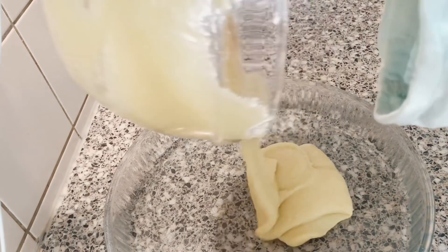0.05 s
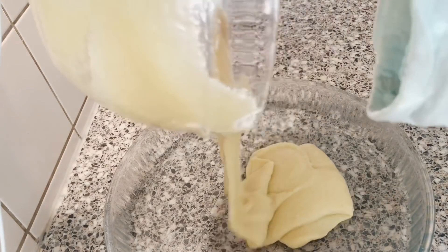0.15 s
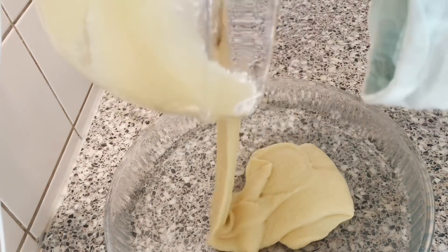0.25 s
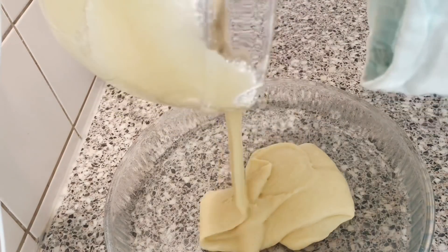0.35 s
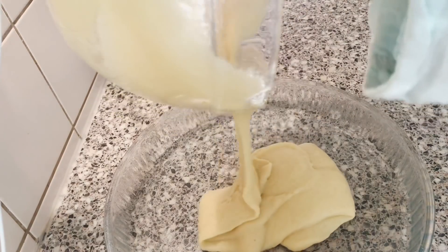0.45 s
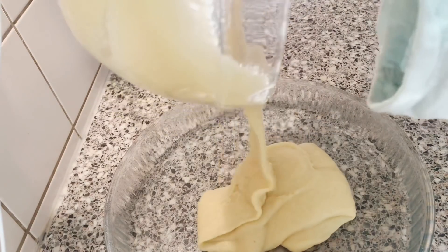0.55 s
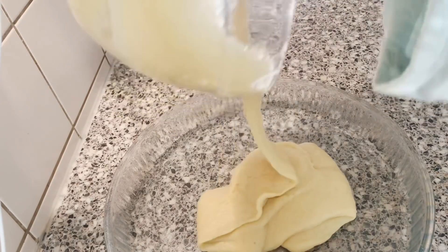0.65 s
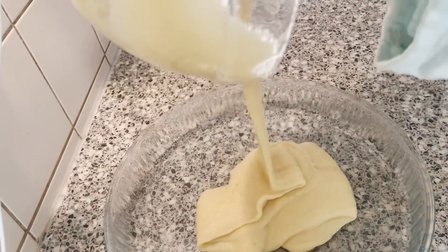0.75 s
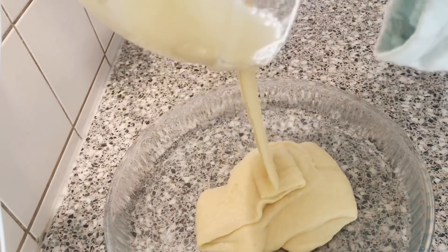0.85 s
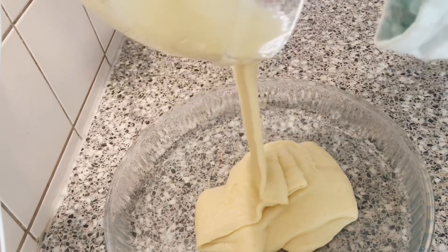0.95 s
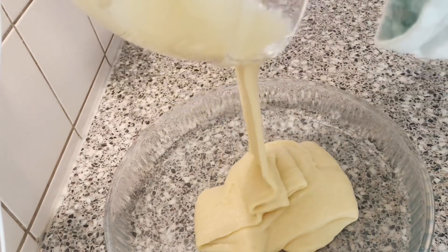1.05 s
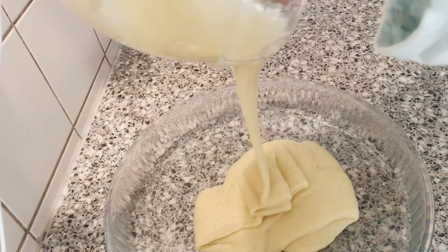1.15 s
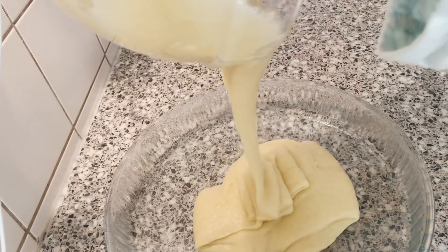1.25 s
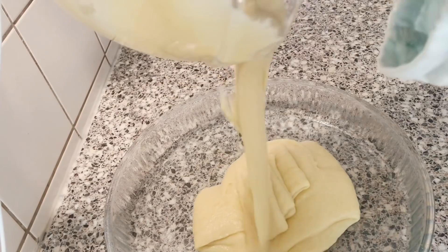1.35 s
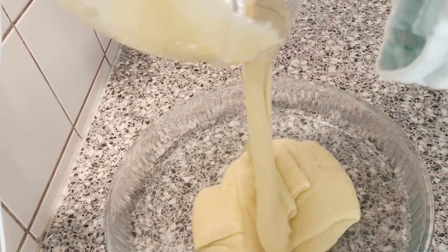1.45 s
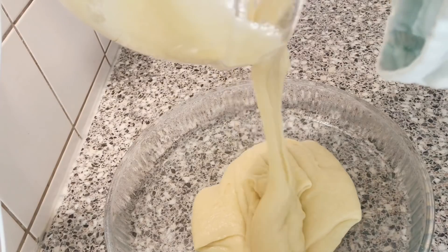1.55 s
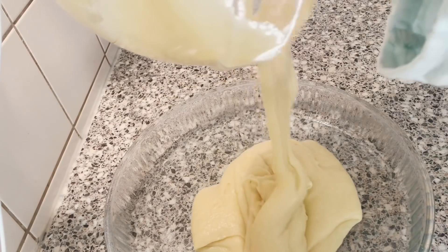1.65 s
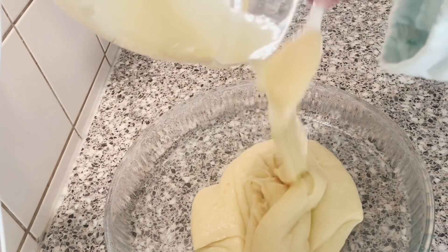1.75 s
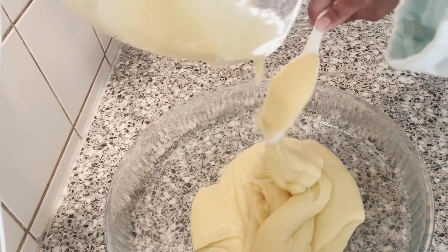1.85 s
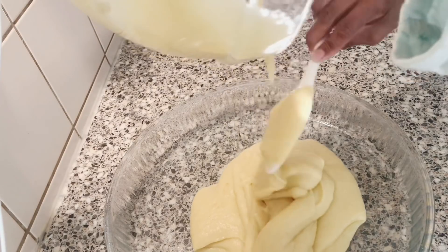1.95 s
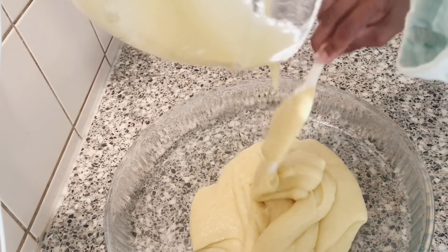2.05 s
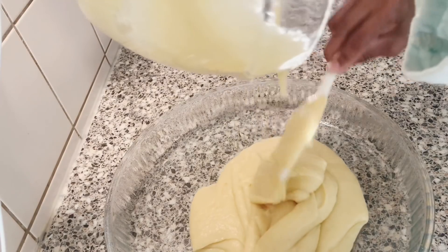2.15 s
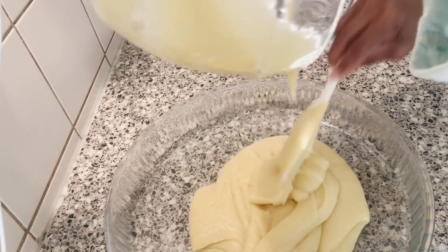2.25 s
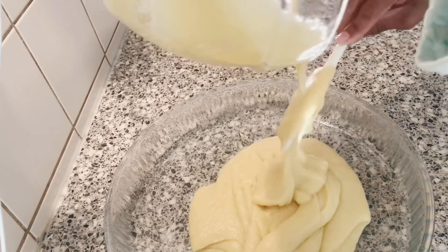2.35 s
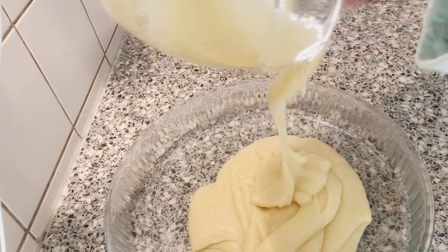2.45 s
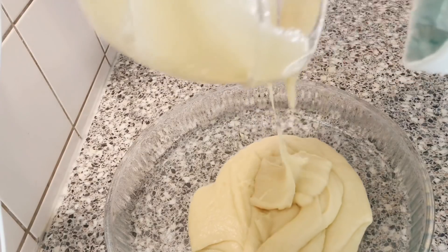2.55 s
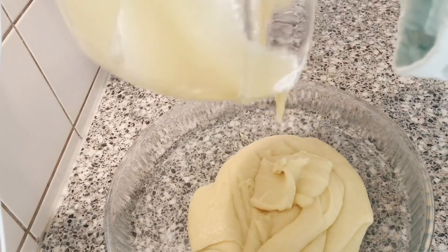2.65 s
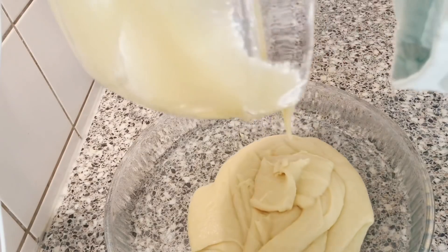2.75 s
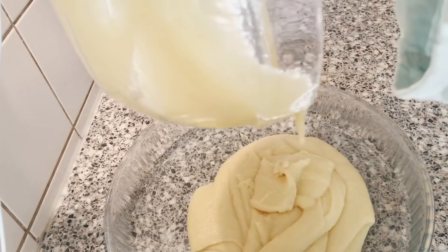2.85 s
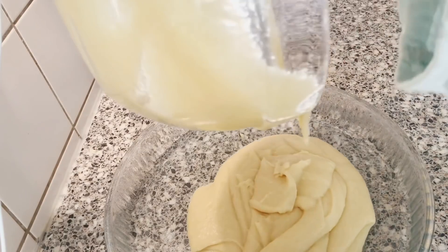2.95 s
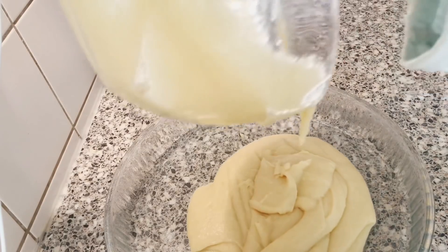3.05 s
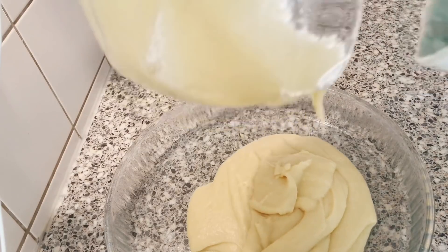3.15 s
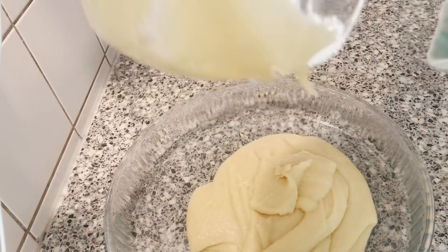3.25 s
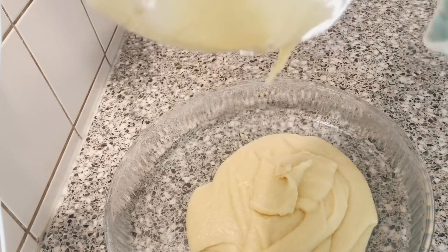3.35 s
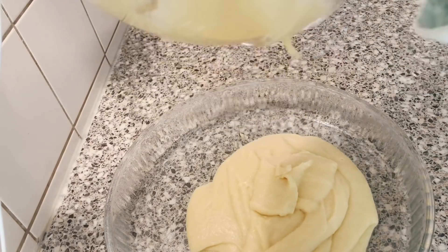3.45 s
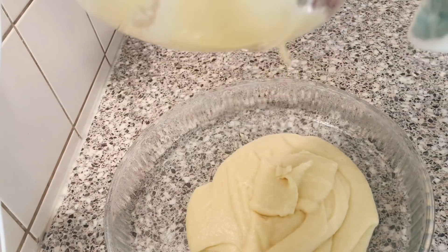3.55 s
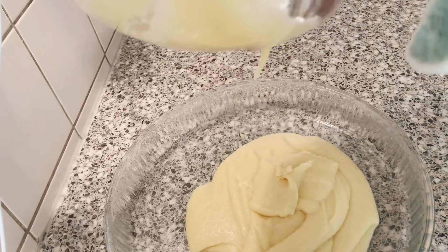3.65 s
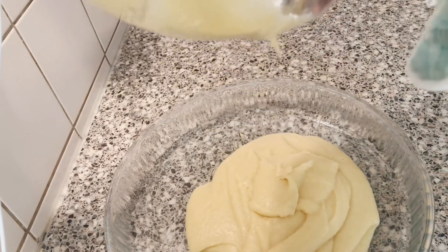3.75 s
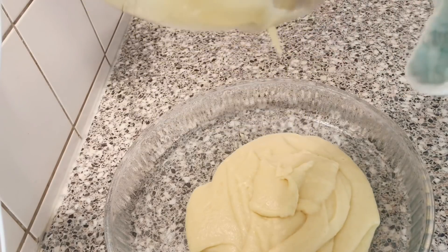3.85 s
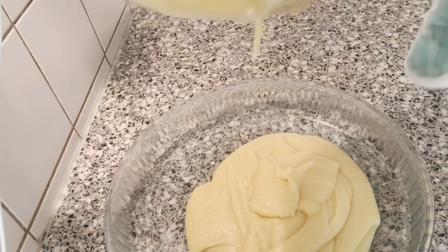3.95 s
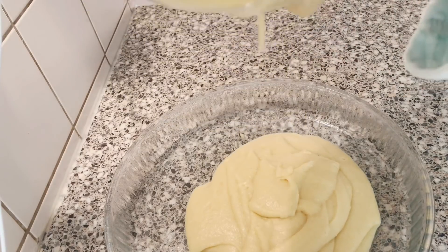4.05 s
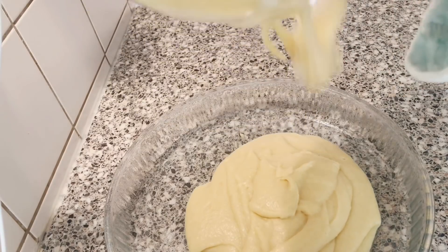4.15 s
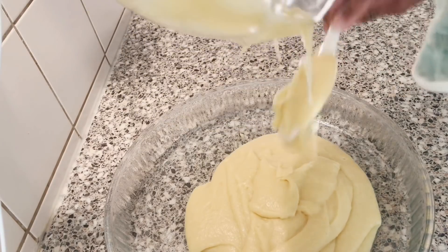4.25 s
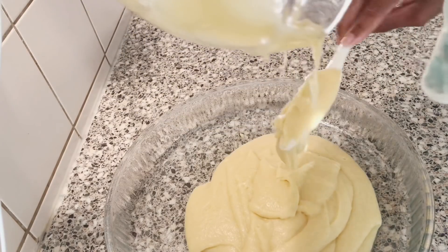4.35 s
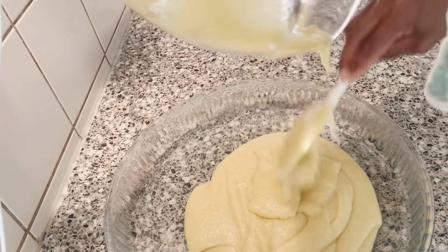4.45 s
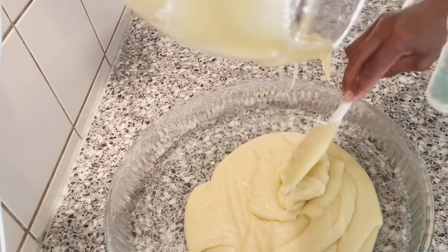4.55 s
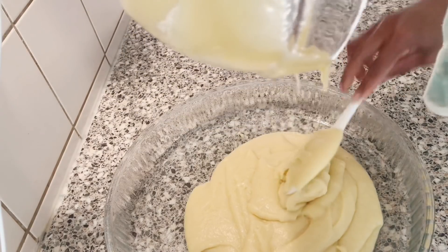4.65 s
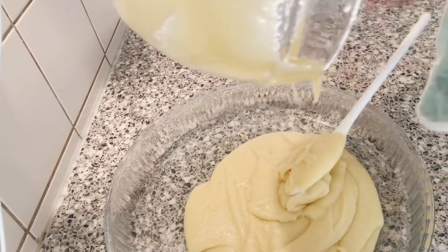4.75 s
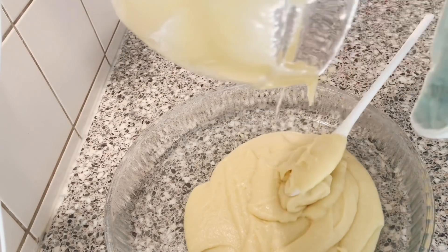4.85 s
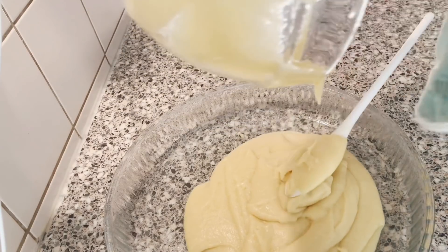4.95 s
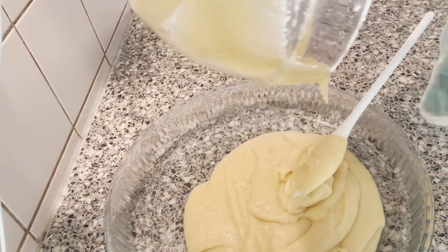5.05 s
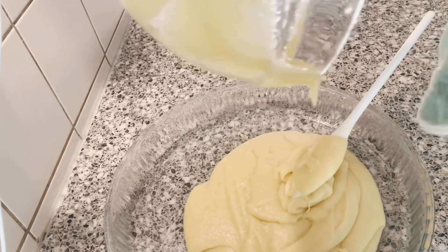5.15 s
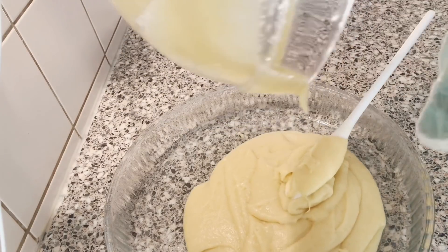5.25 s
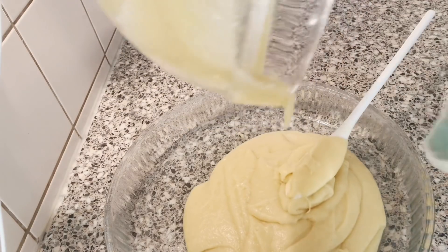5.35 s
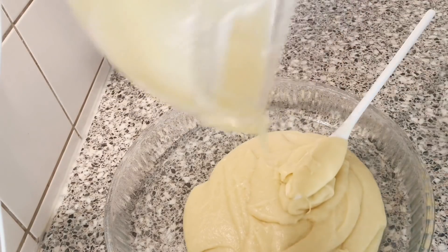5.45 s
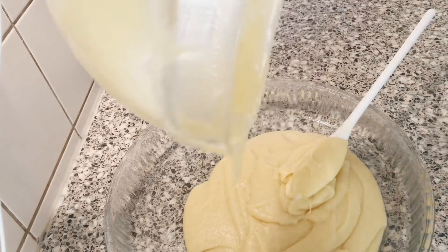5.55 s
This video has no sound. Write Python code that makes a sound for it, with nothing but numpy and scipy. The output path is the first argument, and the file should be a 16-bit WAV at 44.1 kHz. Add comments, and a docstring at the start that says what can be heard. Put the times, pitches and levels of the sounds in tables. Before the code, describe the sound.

A quiet small kitchen, heard close, with low room rumble, steady soft microphone hiss and a barely audible appliance hum. Around 0.3-0.5 s there are faint low handling bumps and a soft flap of batter. At 0.74 s a spoon taps the batter-filled glass bowl: a short, dry, damped crack with a little scraping after it. A thin airy spit follows at 1.0 s, then soft wet plops and folding at 1.5-1.7 s and again at 2.6 s. From 3.1 to 3.5 s the spoon drags through the bowl in gritty, sticky crackles with a slight glassy singing. A dull bump comes at 3.6 s, quick wet wall strokes at 4.0-4.2 s, and a small click at 4.56 s. At 4.8 s the loudest event: a sharp spoon-on-glass clink, two weaker rebounds within a tenth of a second, bright ringing for about half a second and a worktop thud. A low bump at 5.3 s and faint scuffs end it.

```python
"""Thick batter, close to the microphone in a quiet kitchen, is scraped from a glass bowl into a glass dish.
Air pockets ring upward under wet noise; spoon snaps, drags and strokes are grainy noise through resonances.
Handling makes low sagging tones, and an early tap on the filled bowl cracks and rings briefly.
Near the end the spoon knocks the glass in three weakening contacts: noise cracks, ringing modes and a thud.
Behind lie filtered-noise room rumble and microphone hiss, and a faint sine hum from an appliance."""
import sys
import numpy as np
from scipy import signal
from scipy.fft import rfft, irfft, next_fast_len
from scipy.io import wavfile

SR = 44100
rng = np.random.default_rng(int(sys.argv[2]) if len(sys.argv) > 2 else 0)


def put_to_file(sound):
    """Save the sound as 16-bit audio at rate SR, in the file named by the first command-line argument."""
    columns = np.atleast_2d(sound).T  # one column per channel
    safe = np.clip(columns, -1, 1)
    whole_steps = np.round(safe * 32767)
    wavfile.write(sys.argv[1], SR, whole_steps.astype(np.int16))


N = 247312

# room rumble spectrum: (f/Hz, level/dB)
RUMBLE_SPECTRUM = [(15, -45), (25, -17), (45, 1), (128, -3.5), (192, -13), (309, -12.5), (448, -21.5),
                   (574, -11), (659, -19), (1000, -24), (1300, -25), (2200, -120)]
# microphone hiss spectrum: (f/Hz, level/dB)
HISS_SPECTRUM = [(590, -31), (1000, -6), (1160, -6.5), (1820, -4.5), (2160, -9), (2510, -8), (2950, -13),
                 (4270, -8), (5020, -21), (6620, -8), (7090, -3), (7690, -11.5), (8930, -9), (10700, -16),
                 (15700, -10.5)]
# narrow lifts in the hiss: (f/Hz, width/Hz, lift/dB)
HISS_RESONANCES = [(1834, 91, 5.7), (4020, 310, 3.2), (7110, 100, 8.1), (14500, 130, 2), (15700, 180, 4.4)]
# reverberation of the kitchen: (f/Hz, t60/s)
KITCHEN_DECAY = [(100, 0.27), (500, 0.39), (4000, 0.39), (14000, 0.17)]
# soft handling bumps: (t/s, level/dB, f/Hz)
HANDLING_BUMPS = [(0.338, -46.5, 91), (.44, -43, 124), (1.425, -41.5, 125.5), (1.516, -46, 129),
                  (2.038, -45, 142), (3.627, -33.5, 103), (4.561, -45, 269), (4.801, -29, 112),
                  (5.313, -29, 120.3)]
# spectrum of the flapping batter ribbon: (f/Hz, level/dB)
FLAP_SPECTRUM = [(40, -36), (120, -2.5), (230, 2.5), (320, -17), (550, -16), (1200, -45), (4000, -49)]
# damped modes of the batter-filled bowl: (f/Hz, level/dB, t60/s)
FILLED_BOWL_MODES = [(545, -3.5, 0.037), (1247, -7, 0.018), (1840, -16.5, 0.033), (3000, -15, 0.043),
                     (4070, -5, 0.031), (6380, -2.5, 0.018), (9970, -4, .02), (11700, 1, 0.014)]
# spoon contacts on the glass: (t/s, force level/dB, ring level/dB)
GLASS_CONTACTS = [(4.7965, -16.5, -28), (4.8544, -27.5, -28.5), (4.883, -36, -55)]
# ringing modes of the glass: (f/Hz, level/dB, t60/s)
GLASS_MODES = [(1092, -3, .56), (1743, -8, .44), (1832, -6, .18), (2443, -2, .41), (2993, -13, .18),
               (3205, -6, .34), (4081, 1.5, .22), (5054, -5, .22), (6126, -10, .24), (7318, 1, .15),
               (8636, -15, .19), (9981, -22, .2), (11430, -19, .14)]
# damped modes of dish and worktop: (f/Hz, level/dB, t60/s)
WORKTOP_MODES = [(69.5, -11, 0.66), (219, -16, 0.14), (246, -2, 0.082), (316, -17, 0.33), (406, -24, 0.66),
                 (497.4, 1, 0.068), (538, -5, 0.1), (728, -15.5, 0.12)]
# spectrum of the crack of spoon on glass: (f/Hz, level/dB)
CRACK_SPECTRUM = [(30, -40), (120, 0), (500, 1), (800, -3), (1400, 2), (3000, 1.5), (5400, 0), (7500, -2),
                  (9500, -10), (16000, -17)]
# slight level curve across the glass knock: (t/s, level/dB)
KNOCK_LEVEL = [(4.895, -1.5), (4.955, -1)]
# snaps and sticky crackles of the spoon: (t/s, level/dB, t60/s)
SPOON_SNAPS = [(.754, -39, 0.063), (0.816, -43.5, 0.074), (0.8812, -46, 0.045), (1.0158, -47.5, 0.037),
               (3.0427, -46.5, .018), (3.1464, -47, 0.04), (3.202, -34, 0.042), (3.2342, -35, 0.032),
               (3.287, -36, 0.051), (3.3163, -32.5, 0.032), (3.349, -32, 0.04), (3.4628, -45, 0.045),
               (4.5599, -39.5, 0.017), (5.398, -51.5, 0.11), (5.4635, -51.5, 0.08)]
# spoon dragged through the bowl: (t/s, build-up/s, hold/s, level/dB)
SPOON_DRAGS = [(.74, .012, 0.13, -52), (3.11, 0.058, 0.21, -47), (3.44, 0.02, 0.026, -53)]
# spoon sweeping batter along the wall: (t/s, build-up/s, hold/s, level/dB)
WALL_SWEEPS = [(1.618, 0.056, 0.027, -52.5), (4.031, 0.024, 0.081, -53.5)]
# spoon strokes along the wall: (t/s, level/dB)
WALL_STROKES = [(4.076, -45.5), (4.1084, -44), (4.1344, -38.5), (4.171, -45.5)]
# spectrum of snaps, drags and the tap: (f/Hz, level/dB)
CRACKLE_SPECTRUM = [(40, -38), (150, -23.5), (400, 0), (600, -6), (800, -14.5), (1300, -1), (3400, -4),
                    (4800, -7.5), (5500, -5.5), (8500, -6.5), (11500, -10.5), (16000, -9)]
# spectrum of the strokes: (f/Hz, level/dB)
SCRAPE_SPECTRUM = [(150, -30), (400, 2), (700, -14), (1100, 2.5), (2400, -9), (4000, -13), (7000, -22),
                   (16000, -31)]
# resonances of the bowl: (f/Hz, width/Hz, lift/dB)
BOWL_RESONANCES = [(1830, 150, 5), (2940, 120, 4), (4170, 240, 14), (5450, 260, 5), (8500, 300, 4)]
# resonances of the spoon: (f/Hz, width/Hz, lift/dB)
SPOON_RESONANCES = [(400, 140, 3), (1030, 90, 10), (1830, 140, 6), (4060, 240, 11)]
# glass modes that the dragging spoon makes sing: (f/Hz, width/Hz, lift/dB)
SINGING_RESONANCES = [(4170, 160, 5), (5420, 200, 5)]
# batter folding and air pockets opening: (t/s, level/dB, f/Hz, wet noise level/dB)
AIR_POCKETS = [(1.134, -57.5, 560, 4.5), (1.478, -46, 545, -9.5), (1.525, -51, 562, -11),
               (1.556, -51, 388, -2.5), (1.626, -49.5, 383, 0.5), (1.699, -47, 382, 1),
               (2.628, -46, 531, 2), (2.649, -46.5, 391, -11), (3.765, -61, 570, 11)]
# thin hisses, as of air leaving the batter: (t/s, level/dB)
AIR_SPITS = [(1.017, -51), (1.035, -37.5)]
# spectrum of wet batter noise: (f/Hz, level/dB)
WET_SPECTRUM = [(150, -16), (400, -4), (800, -5), (1350, -2), (2400, -10), (4000, -17), (7000, -25),
                (16000, -24)]
# spectrum of the thin hisses: (f/Hz, level/dB)
THIN_SPECTRUM = [(500, -7), (5000, -11.5), (7500, -7), (11000, 1), (12500, 6.5), (14500, -2), (16000, -15)]

BUMP_RISE_S, BUMP_CYCLES = 0.0073, 7.1  # cycles in one t60
BUMP_SAG_PER_S = 1.3  # share of the pitch
REBOUND_S, REBOUND_DB = 0.047, -8  # after every bump
FLUTTER_S, FLUTTER_DB = 0.36, -58
FLUTTER_BUILD_S, FLUTTER_HOLD_S, FLUTTER_RELEASE_S = 0.057, 0.13, 0.15
TAP_S, TAP_DB, TAP_CRACK_DB = 0.7358, -30.5, -24.5
CLINK_TILT = 0.16  # ring of the first blow, dB per octave
RING_DULLING, CRACK_DULLING = 0.48, 0.28  # dB per octave lost per dB of force
THUD_DB, THUD_GROWTH = -23.5, 0.83  # first blow; dB per dB of force
SNAP_RISE_SHARE = 0.056  # rise over t60
SNAP_T60_S, SNAP_DULLING = 0.026, 0.71  # typical snap; dB per octave lost per doubling of t60
DRAG_RELEASE_S, SWEEP_RELEASE_S = 0.41, 0.053
STROKE_RISE_S, STROKE_T60_S = 0.0025, 0.051
POCKET_HZ, POCKET_T60_S, POCKET_RISE_S = 440, 0.084, 0.0021  # a typical pocket
POCKET_DAMPING = 1.1  # decay shortens with this power of pitch
SPIT_RISE_S, SPIT_T60_S = 0.0025, 0.07
TOP_HZ = 15800  # upper band limit of the recorder


def amp(db):
    """Decibels to gain."""
    return 10 ** (np.asarray(db) / 20)


def along(points, hz):
    """Interpolate (f/Hz, value) points on a log frequency axis."""
    f, v = np.transpose(points)
    return np.interp(np.log(hz + 1), np.log(f + 1), v)


def add(track, s, sound):
    """Mix a sound into the track at time s."""
    start = round(s * SR)
    track[start:start + len(sound)] += sound[:N - start]


def coloured(x, points, peaks=(), tilt=0, size=8192):
    """Causal unit-energy filter: a spectrum lifted by resonances and tilted in dB per octave."""
    hz = np.fft.rfftfreq(size, 1 / SR)
    db = along(points, hz) + tilt * np.log2(hz + 20)
    for centre, width, lift in peaks:
        db = db + lift / (1 + (2 * (hz - centre) / width) ** 2)
    # folding the cepstrum to positive time makes the filter minimum phase
    cepstrum = irfft(np.log(amp(db)))
    response = irfft(np.exp(rfft(2 * cepstrum[:size // 2], size)))
    response = response / np.linalg.norm(response)
    return signal.fftconvolve(x, response)[:len(x)]


def fade(t60):
    """One second of exponential decay."""
    return np.exp(-np.log(1000) * np.arange(SR) / SR / t60)


def swell(rise, t60):
    """A soft start and an exponential decay, with peak 1."""
    onset = 1 - np.exp(-(np.arange(SR) / SR / rise) ** 2)
    shape = onset * fade(t60)
    return shape / shape.max()


def gesture(build, hold, release):
    """One second of a movement that builds up to 1, holds, and dies away with a t60 of release."""
    t = np.arange(SR) / SR
    time_after_hold = np.maximum(t - build - hold, 0)
    return np.minimum(t / build, 1) * np.exp(-np.log(1000) * time_after_hold / release)


def grains(count, rough):
    """Noise of rms 1 made of tiny slips of uneven size, which come in clumps."""
    slips = np.repeat(rng.standard_normal(count // 20 + 1), 20)[:count]
    clumps = np.repeat(rng.standard_normal(count // 130 + 1), 130)[:count]
    unevenness = np.clip(slips + clumps / 2, -2, 2)
    x = rng.standard_normal(count) * np.exp(rough * unevenness)
    return x / x.std()


def tone(hz, glide=0):
    """One second of a sine of rms 1 whose pitch drifts by a share each second."""
    t = np.arange(SR) / SR
    return np.sqrt(2) * np.sin(2 * np.pi * hz * t * (1 + glide * t / 2))


def ring(modes, blows, rise, twin_db=-120):
    """Blows (t/s, level/dB, tilt/dB per octave) add energy to modes, each beating with a weaker twin."""
    out = np.zeros(SR)
    first, lowest = blows[0][0], modes[0][0]
    for k, (hz, db, t60) in enumerate(modes):
        shape = swell(rise, t60)
        energy = np.zeros(SR)
        for s, blow_db, tilt in blows:
            blow = amp(blow_db + tilt * np.log2(hz / lowest)) * shape
            delay = max(0, round((s - first) * SR))
            energy += np.pad(blow, (delay, 0))[:SR] ** 2
        twin_hz = hz + rng.uniform(7, 16)
        twin = amp(twin_db) * np.roll(tone(twin_hz), -rng.integers(SR // 100))  # random phase
        out += (-1) ** k * amp(db) * np.sqrt(energy) * (tone(hz) + twin)
    return out


def kitchen(x, wet_db, delay=0.009):
    """Direct sound plus a decaying noise tail from the walls, whose treble dies first."""
    hz, t, z = signal.stft(rng.standard_normal(SR // 2), SR, nperseg=256)
    decay = np.exp(-np.log(1000) * t / along(KITCHEN_DECAY, hz)[:, None])
    tail = signal.istft(z * decay, SR, nperseg=256)[1]
    tail = np.pad(tail / np.linalg.norm(tail), (round(delay * SR), 0))
    return x + amp(wet_db) * signal.fftconvolve(x, tail)[:N]


def background():
    """Steady filtered noise gives room rumble and microphone hiss; a sine is the faint appliance hum."""
    rumble = amp(-60) * coloured(rng.standard_normal(N), RUMBLE_SPECTRUM)
    hum = amp(-65) * np.sin(2 * np.pi * 126 * np.arange(N) / SR)
    hiss = amp(-55.5) * coloured(rng.standard_normal(N), HISS_SPECTRUM, HISS_RESONANCES)
    return rumble + hum + hiss


def flutter():
    """The ribbon of batter flaps down: a short swell of mostly low noise."""
    out = np.zeros(N)
    flapping = gesture(FLUTTER_BUILD_S, FLUTTER_HOLD_S, FLUTTER_RELEASE_S) * rng.standard_normal(SR)
    add(out, FLUTTER_S, amp(FLUTTER_DB) * coloured(flapping, FLAP_SPECTRUM))
    return out


def bumps():
    """Soft contacts give only a few cycles, sagging in pitch, and rebound once more weakly."""
    out = np.zeros(N)
    for s, db, hz in HANDLING_BUMPS:
        shape = swell(BUMP_RISE_S, BUMP_CYCLES / hz)
        sagging = tone(hz, glide=-BUMP_SAG_PER_S) / np.sqrt(2)  # peak 1
        bump = amp(db) * sagging * shape
        add(out, s, bump)
        add(out, s + REBOUND_S, amp(REBOUND_DB) * bump)
    return out


def tap():
    """The spoon cracks on the filled bowl; batter damps its modes, and low ones build up slowest."""
    crack = amp(TAP_CRACK_DB) * swell(0.001, 0.021) * grains(SR, rough=0.19)
    sound = coloured(crack, CRACKLE_SPECTRUM, BOWL_RESONANCES)
    for hz, db, t60 in FILLED_BOWL_MODES:
        sound = sound + amp(TAP_DB + db) * tone(hz) * swell(3.7 / hz, t60)
    out = np.zeros(N)
    add(out, TAP_S, sound)
    return out


def clink():
    """Each contact cracks, rings the glass and thuds into the worktop; weaker blows crack and ring duller."""
    glass, knock = np.zeros(N), np.zeros(N)
    times, force_db, ring_db = np.transpose(GLASS_CONTACTS)
    weaker_db = force_db[0] - force_db
    tilts = CLINK_TILT - RING_DULLING * weaker_db
    ring_blows = list(zip(times, ring_db, tilts))
    thuds = [(s, THUD_DB - THUD_GROWTH * weaker, 0) for s, weaker in zip(times, weaker_db)]
    add(glass, times[0], ring(GLASS_MODES, ring_blows, rise=0.0006, twin_db=-9))
    add(knock, times[0], ring(WORKTOP_MODES, thuds, rise=0.0041))
    for s, db, weaker in zip(times, force_db, weaker_db):
        tick = amp(-5.5) * swell(0.0001, 0.007)  # the instant of contact
        clatter = swell(0.0002, 0.05)
        crack = amp(db) * (tick + clatter) * grains(SR, rough=0.11)
        add(knock, s, coloured(crack, CRACK_SPECTRUM, tilt=-CRACK_DULLING * weaker))
    gain = amp(np.interp(np.arange(N) / SR, *np.transpose(KNOCK_LEVEL)))
    return kitchen(gain * glass, wet_db=-16) + kitchen(gain * knock, wet_db=-10.5)


def snaps():
    """The spoon sticks and lets go: grainy bursts, the longer the softer in onset and the duller."""
    out = np.zeros(N)
    for s, db, t60 in SPOON_SNAPS:
        snap = amp(db) * swell(SNAP_RISE_SHARE * t60, t60) * grains(SR, rough=0.23)
        tilt = -SNAP_DULLING * np.log2(t60 / SNAP_T60_S)
        add(out, s, coloured(snap, CRACKLE_SPECTRUM, BOWL_RESONANCES, tilt=tilt))
    return out


def drags():
    """Rough stick-slip of the dragged spoon excites the bowl and makes glass modes sing."""
    out = np.zeros(N)
    for s, build, hold, db in SPOON_DRAGS:
        drag = amp(db) * gesture(build, hold, DRAG_RELEASE_S) * grains(SR, rough=0.85)
        add(out, s, coloured(drag, CRACKLE_SPECTRUM, BOWL_RESONANCES + SINGING_RESONANCES, tilt=-0.76))
    return out


def wall_scrapes():
    """Along the wall, wet sweeps excite the bowl's resonances and short strokes the spoon's."""
    out = np.zeros(N)
    for s, build, hold, db in WALL_SWEEPS:
        sweep = amp(db) * gesture(build, hold, SWEEP_RELEASE_S) * grains(SR, rough=0.59)
        add(out, s, coloured(sweep, WET_SPECTRUM, BOWL_RESONANCES))
    for s, db in WALL_STROKES:
        stroke = amp(db) * swell(STROKE_RISE_S, STROKE_T60_S) * grains(SR, rough=0.49)
        add(out, s, coloured(stroke, SCRAPE_SPECTRUM, SPOON_RESONANCES))
    return out


def batter():
    """Air pockets ring upward in pitch under a wet smack, low ones longest; thin hisses escape."""
    out = np.zeros(N)
    for s, db, hz, wet_db in AIR_POCKETS:
        t60 = POCKET_T60_S * (POCKET_HZ / hz) ** POCKET_DAMPING
        shape = amp(db) * swell(POCKET_RISE_S, t60)
        smack = coloured(shape * grains(SR, rough=0.14), WET_SPECTRUM, BOWL_RESONANCES)
        add(out, s, shape * tone(hz, glide=1.7) + amp(wet_db) * smack)
    for s, db in AIR_SPITS:
        spit = amp(db) * swell(SPIT_RISE_S, SPIT_T60_S) * grains(SR, rough=0.22)
        add(out, s, coloured(spit, THIN_SPECTRUM))
    return out


def scene():
    """All sources at one microphone, the kitchen's reverberation around the foreground."""
    handling = kitchen(bumps() + flutter(), wet_db=-10.5)
    scraping = kitchen(tap() + snaps() + drags() + wall_scrapes() + batter(), wet_db=-10.5)
    return (background() + handling + clink() + scraping)[None]


def record(dry):
    """The recorder thins the deepest bass and keeps nothing above its band limit."""
    m = next_fast_len(N + SR // 2)
    bass_cut = signal.butter(2, 45, "highpass", fs=SR, output="sos")
    thin = signal.sosfilt(bass_cut, dry)
    passband = np.fft.rfftfreq(m, 1 / SR) < TOP_HZ
    return irfft(rfft(thin, m) * passband, m)[..., :N]


dry = scene()
out = record(dry)
put_to_file(out)
```